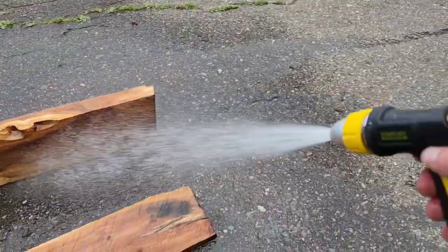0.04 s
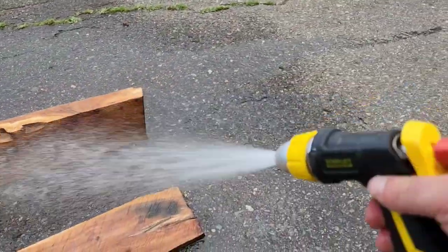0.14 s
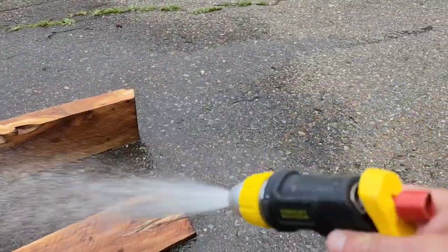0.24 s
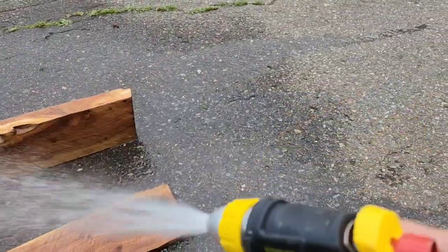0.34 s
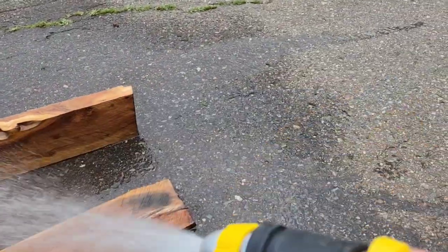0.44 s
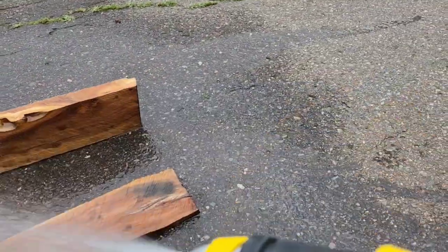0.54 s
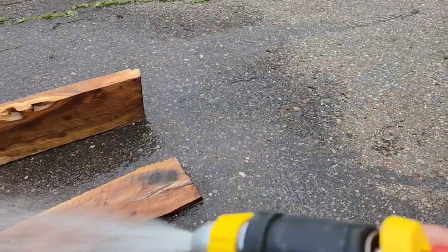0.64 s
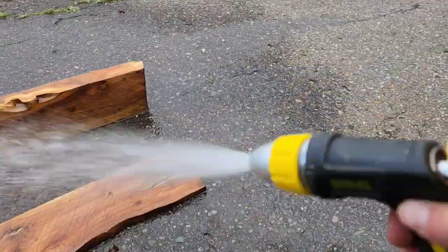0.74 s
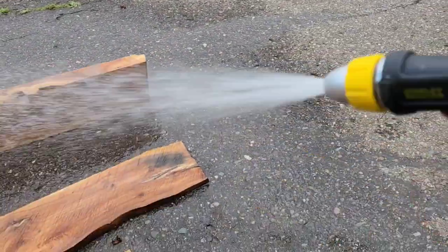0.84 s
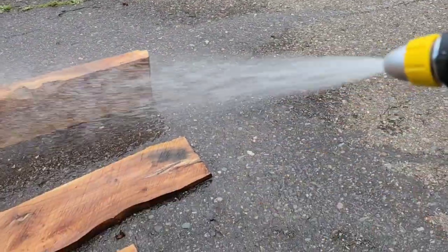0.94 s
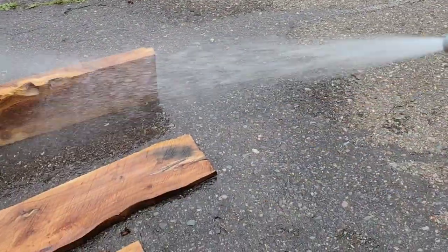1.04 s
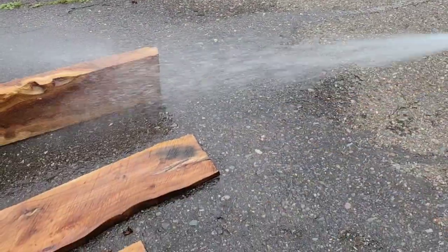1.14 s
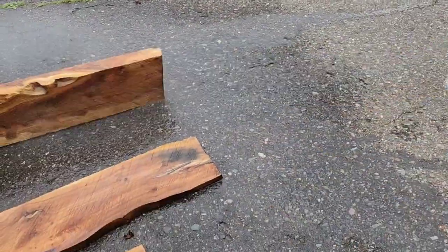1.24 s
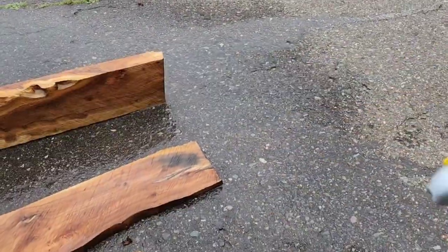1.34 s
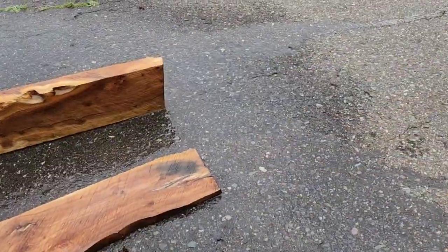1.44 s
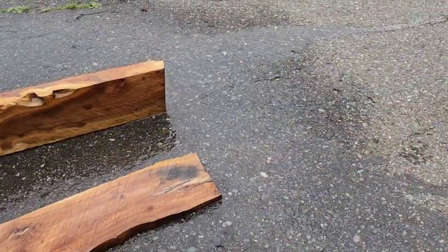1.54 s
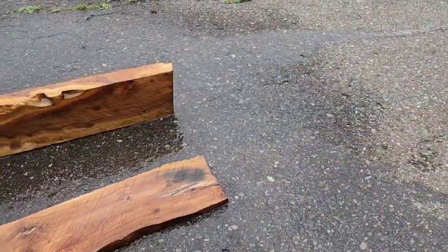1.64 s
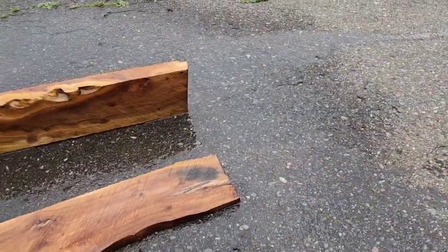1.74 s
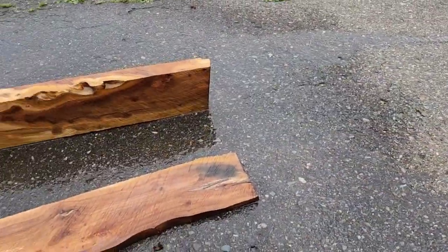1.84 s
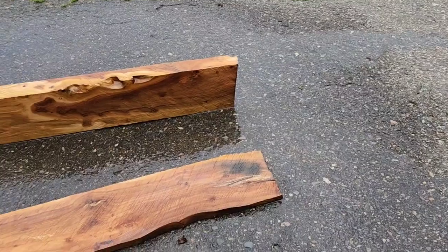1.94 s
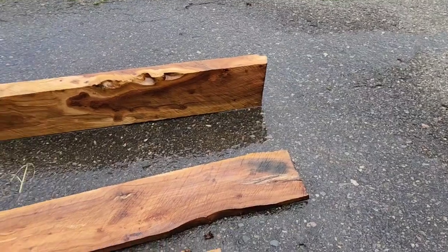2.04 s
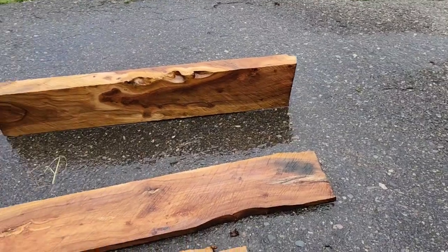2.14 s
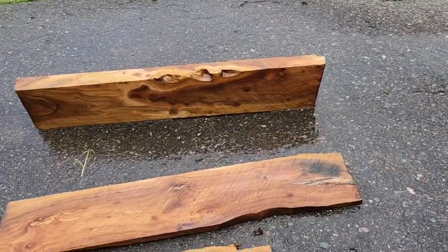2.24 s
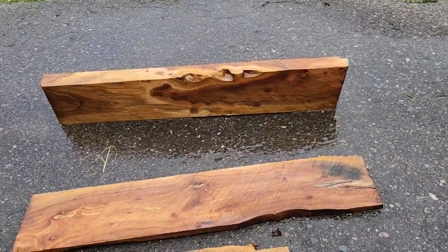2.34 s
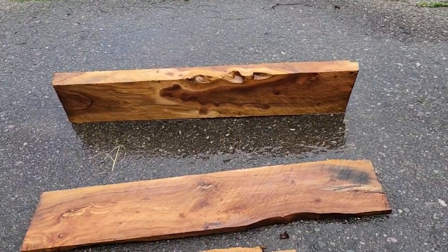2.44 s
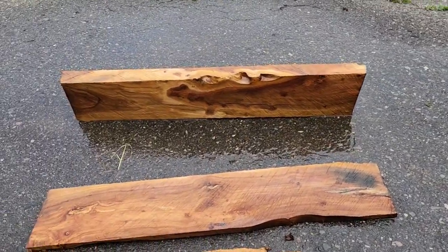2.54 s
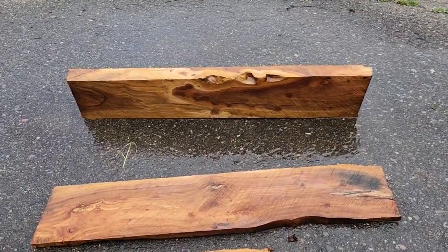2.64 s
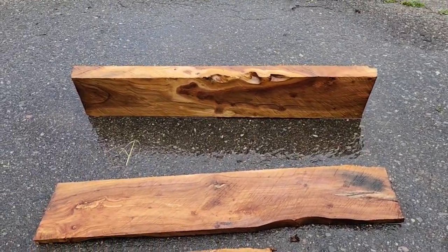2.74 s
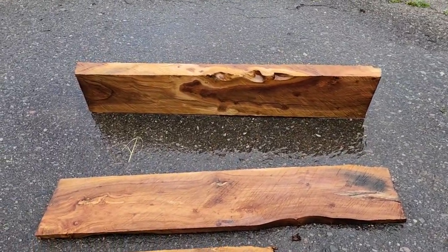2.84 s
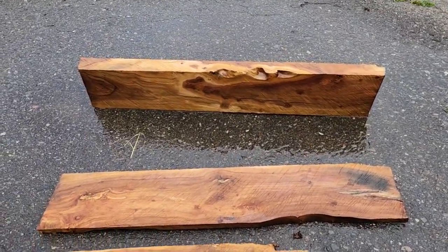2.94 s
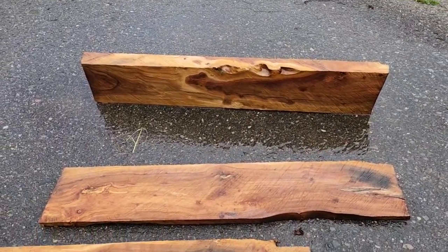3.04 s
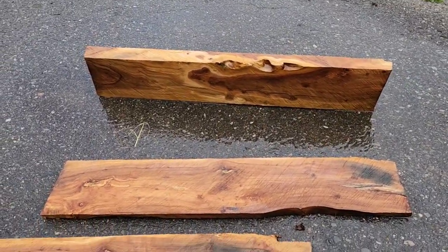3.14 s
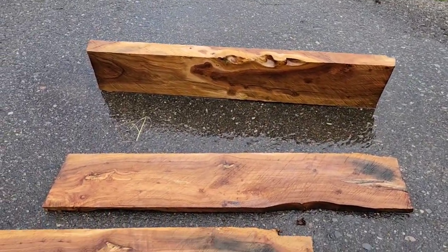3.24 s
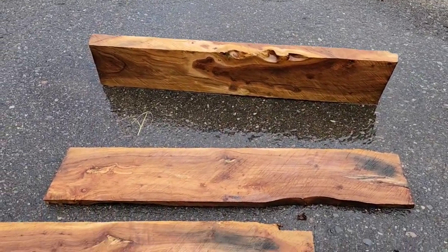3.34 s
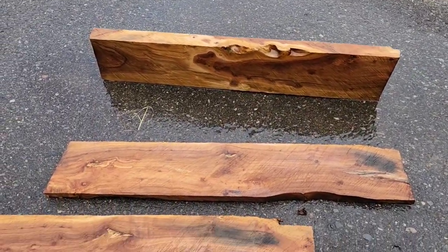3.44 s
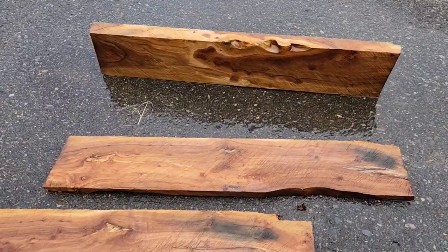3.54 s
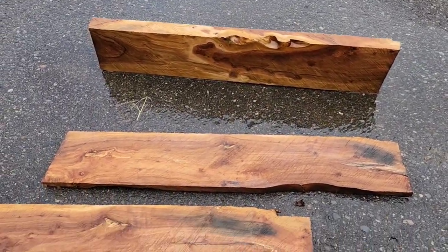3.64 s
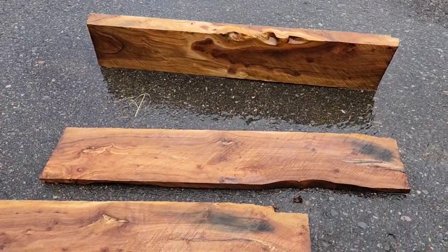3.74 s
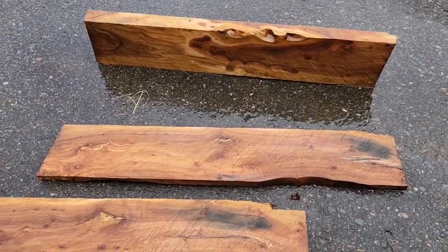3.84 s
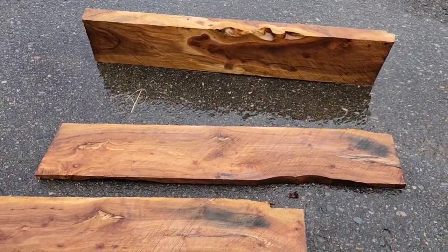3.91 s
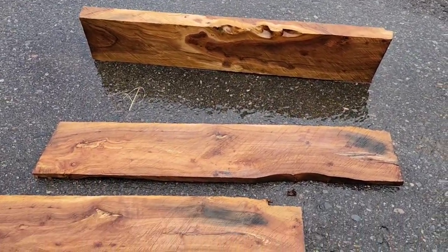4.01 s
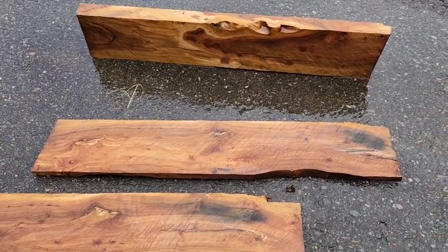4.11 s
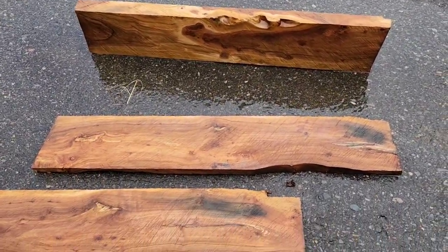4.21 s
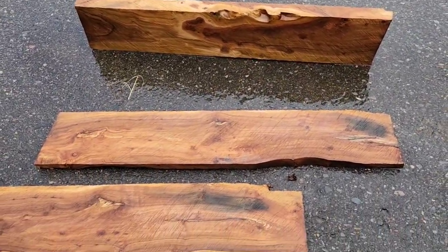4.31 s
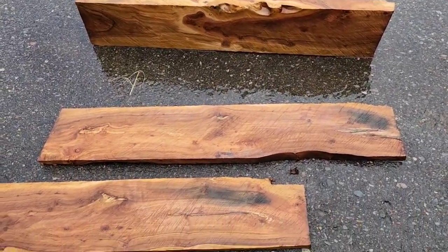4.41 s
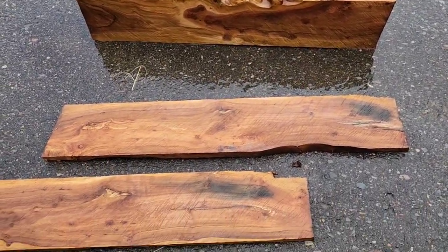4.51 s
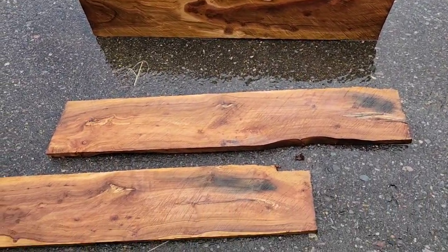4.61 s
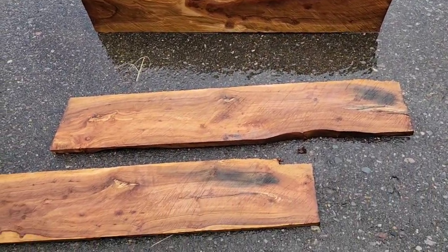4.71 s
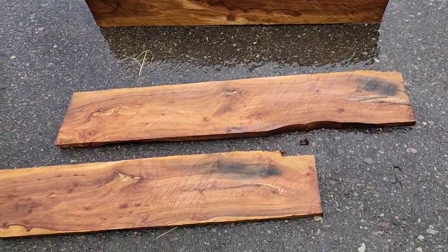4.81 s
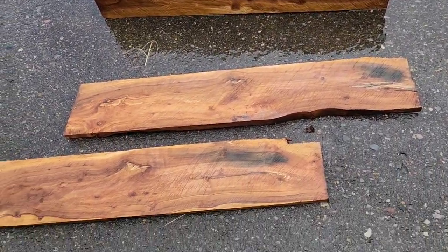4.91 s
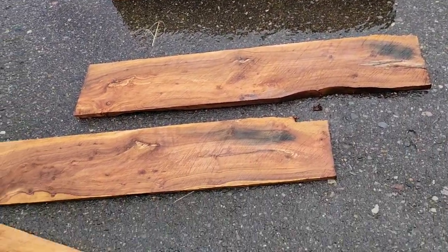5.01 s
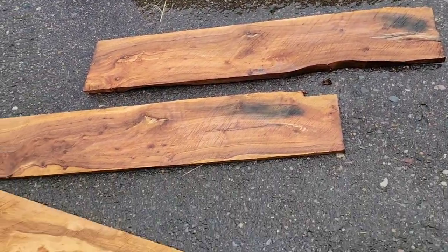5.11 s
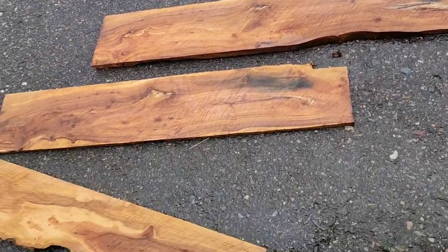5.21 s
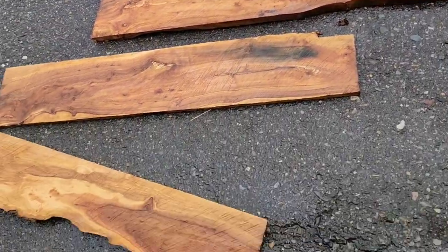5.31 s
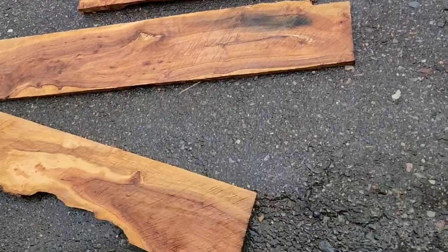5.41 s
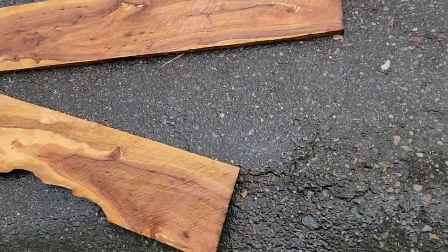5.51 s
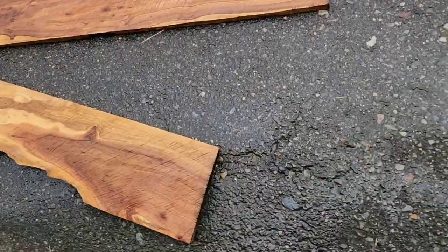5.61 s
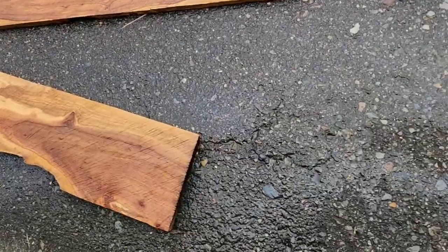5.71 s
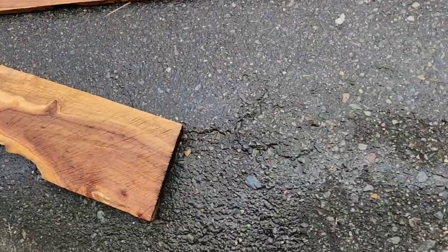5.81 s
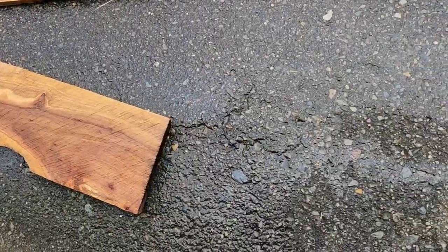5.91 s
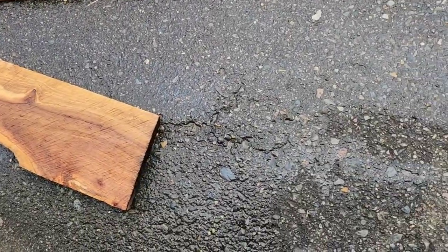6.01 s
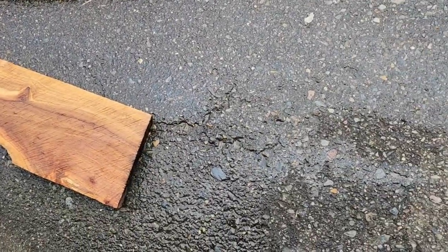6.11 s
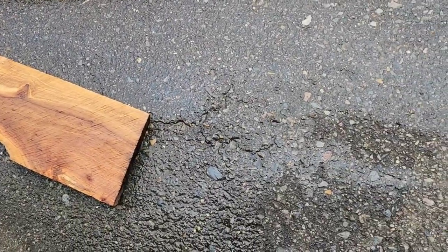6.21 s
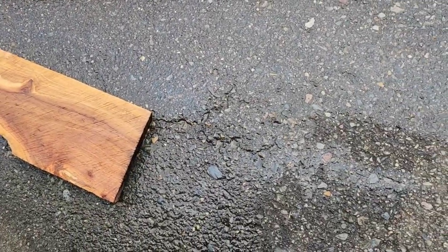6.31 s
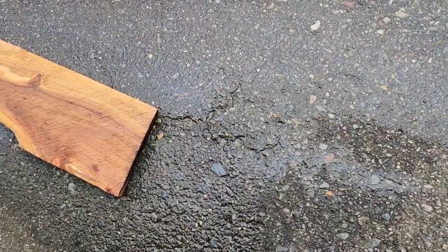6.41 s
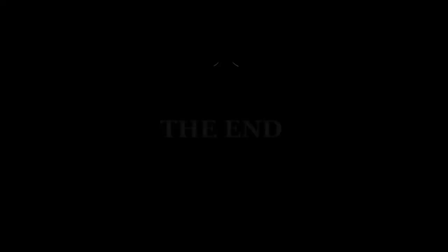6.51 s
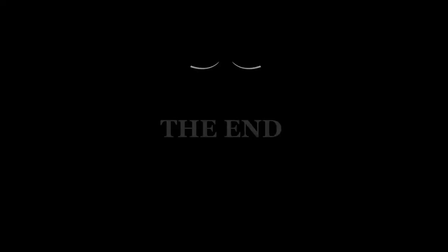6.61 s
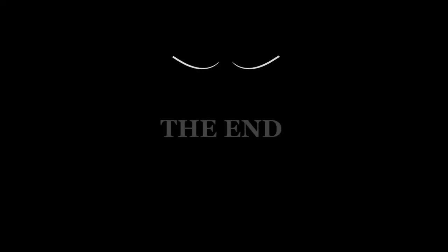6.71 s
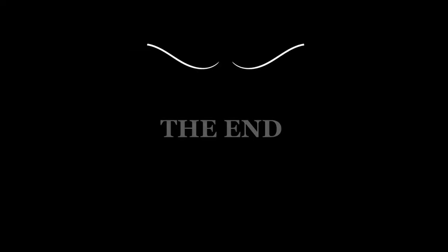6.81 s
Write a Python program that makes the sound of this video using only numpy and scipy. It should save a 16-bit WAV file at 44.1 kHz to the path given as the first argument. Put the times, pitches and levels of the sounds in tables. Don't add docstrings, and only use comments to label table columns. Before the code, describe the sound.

Loud hissing hose spray sweeps over boards and pavement, snaps off with a click, leaving far traffic, a trilling bird and faint wind puffs.

```python
import sys
import numpy as np
from scipy import signal
from scipy.fft import rfft, irfft
from scipy.io import wavfile
from scipy.ndimage import uniform_filter1d, minimum_filter1d

SR = 44100
rng = np.random.default_rng(int(sys.argv[2]) if len(sys.argv) > 2 else 0)


def file_out(sig):
    cols = np.atleast_2d(sig).T
    lim = np.clip(cols, -1, 1)
    pcm = np.round(lim * 32767).astype(np.int16)
    wavfile.write(sys.argv[1], SR, pcm)


def volts_from_db(level):
    exponent = np.asarray(level, float) / 20
    return 10 ** exponent


N = 302570
CLOCK = np.arange(0, N / SR, .01)
EDGE_HZ = 15700

# level/dB, lift on wood/dB, runs on after the trigger/s, then falls/(dB/s)
SPRAY_LAYERS = [
    (-28, -4, 0.068, 411),
    (-35, 1.5, 0.028, 303.5),
    (-39.5, 1.5, .005, 195.5),
    (-54, 9.5, .01, 85.5),
]
# low f/Hz, high f/Hz
SPRAY_BANDS = [(9500, 16000), (3000, 8500), (600, 2500), (100, 500)]
# f/Hz, density/(dB per Hz)
SPRAY_TONE = [(65, -26.5), (110, 7), (209, -7), (470, -9), (603, -8.5), (993, -7.5), (1470, -4.5),
              (2750, -7), (4250, -2.5), (5010, -8.5), (7440, -4), (9340, -9.5), (11500, 2), (14800, 0.5),
              (15700, -1.5)]
# f/Hz, likeness 0-1
SPRAY_SAME = [(60, 1), (200, 0.96), (700, 0.6), (1500, 0.65), (3500, .35), (7000, 0.078), (12000, .05)]
# f/Hz, left-right/dB
PORTS = [(60, 2), (99, 3.5), (160, -1.5), (270, -0.5), (450, 3.5), (740, 1.5), (1220, 5.5), (2010, 0.5),
         (3330, -3.5), (5500, 5.5), (9080, 5.5), (15000, -4.5)]
# t/s, left lead/ms, flow/dB, share landing on wood 0-1
AIM = [
    (0, 0.063, 0, 0.27),
    (.08, 0.012, 1, 0.15),
    (.2, 0.14, 0.5, 0.2),
    (.5, 0.19, 1, 0.37),
    (.74, .1, 1, 0.28),
    (.82, .0, 1, 1),
    (.9, -0.096, 0.5, 0.5),
    (1.04, -0.16, -1, 0.33),
    (1.15, -0.17, -3, 0.45),
]
SPRAY_PAN_DB, PAN_DB_PER_MS = -1.2, 11
MIST_BRIGHT_DB, BRIGHT_DB_PER_MS, MIST_DULLED_DB = 1, 2.5, -4.5
DRY_S = 1.33

# t/s, roar level/dB, nearness of a passing car 0-1
STREET = [(1.5, -59.5, 0.05), (1.9, -59, 0.18), (2.4, -58.5, .2), (2.8, -59.5, 0.52), (3.6, -58.5, .1),
          (4.3, -56.5, 0.43), (4.6, -59, 0.47), (5.0, -59.5, 0.52), (5.4, -59.5, 0.66), (5.95, -60, 1),
          (6.4, -57.5, 0.66)]
# low f/Hz, high f/Hz
STREET_BANDS = [(30, 150), (400, 1000), (1050, 2300), (2900, 5200), (900, 1400)]
# f/Hz, density/(dB per Hz)
STREET_TONE = [(15, -35), (25, -3), (48, 5), (68, -1.5), (128, -10), (183, -17), (354, -19.5), (623, -14.5),
               (799, -15.5), (1610, -28.5), (2120, -28), (2780, -49), (4170, -43.5), (5600, -57.5),
               (7280, -93.5), (12300, -120)]
# f/Hz, likeness 0-1
STREET_SAME = [(60, 0.98), (180, 0.91), (550, 0.65), (1650, 0.19), (4970, 0.0683), (15000, 0.04)]
# f/Hz, left-right/dB
STREET_SIDE = [(60, 0.0), (130, -1), (290, 2.5), (640, 0), (1410, 2.5), (3100, 5.5), (6820, 9), (15000, 4)]
# t/s, level/dB
CHORUS = [(1.3, -76.5), (1.5, -72), (2.0, -69.5), (2.3, -79), (3.5, -83.5), (4.3, -77), (4.6, -85.5),
          (4.9, -75), (5.2, -83), (5.6, -77.5), (5.95, -85.5), (6.4, -84.5)]
# f/Hz, density/(dB per Hz)
HISS_TONE = [(3290, -31.5), (5600, 0), (7040, -1), (8920, -18.5), (9980, -16.5), (11500, -2), (12700, -7),
             (15100, -6), (15700, -8.5)]
# t/s, lift/dB, lasts/s
RUSTLES = [
    (1.35, 13.5, 0.49),
    (4.25, 3, .2),
    (4.85, 8, .12),
    (5.2, 1.5, .25),
    (5.696, 8, 0.26),
    (6.199, -1.5, .3),
]
RUMBLE_DB, RUMBLE_FOLLOWS, UPPER_DB, NEAR_LIFT_DB = -49, .3, -5, 5
WHINE_DB, WHINE_LIFT_DB = -6, 9.5
BREEZE_DB, BREEZE_S, BREEZE_DIES_S = 5.5, 1.4, .35
DIP_S, DIP_DB, DIP_LASTS_S = 1.1, -21.5, 0.028
HAZE_DB = 5.5
HISS_DB, LEAVES_DB, LEAVES_FOLLOW = -93, -91.5, .25

# t/s, peak level/dB, left-right/dB, pitch f/Hz
PUFFS = [
    (0.794, -36.5, -17, 117),
    (0.827, -28, -8, 32.3),
    (1.047, -33.5, 11, 69),
    (1.335, -36, -7, 59.6),
    (1.425, -37, -15, 81),
    (2.163, -38.5, 0.0, 67),
    (5.463, -29, -10, 46.2),
    (6.183, -48.5, 3, 83.2),
]

# t/s, peak level/dB, left-right/dB
TRIGGER = (1.1472, -10, -5)
# f/Hz, level/dB, t60/s
TRIGGER_MODES = [(2300, 0, .007), (3100, -6, .004), (4200, -2, .005), (5300, -3, .004)]
SQUEAL_HZ, SQUEAL_DB, SQUEAL_PEAK_S = 2890, -60, 1.295
SQUEAL_RISE_DB_PER_S, SQUEAL_FALL_DB_PER_S = 6, 150

# t/s, peak level/dB, left-right/dB, treble lift/dB
TICKS = [
    (4.788, -47, 7.5, -17.5),
    (4.816, -54, -8, -30.5),
    (4.8905, -57.5, -9, -16.5),
    (5.1097, -35, -10.5, -17.5),
    (5.5133, -52, -4.5, -20),
    (5.1179, -45.5, -13.5, -17.5),
]
# t/s, peak level/dB, left-right/dB, treble lift/dB
SPITS = [
    (1.2304, -28, -1.5, 10),
    (1.6965, -70, 1.0, 16),
    (5.837, -65.5, 16, 16),
    (6.4003, -67, 7, 16),
]
# f/Hz, density/(dB per Hz)
TICK_TONE = [(1060, -66), (1800, -0.5), (2290, -7), (4420, -3), (5580, -24.5), (6900, -9), (9640, -30.5),
             (12300, 0), (15600, -24.5), (16500, -36)]
# t/s, peak level/dB, lasts/s
SCUFF = [
    (5.075, -64, 0.033),
    (5.125, -65.5, 0.018),
    (5.18, -75, 0.028),
]
# f/Hz, density/(dB per Hz)
SCUFF_TONE = [(1650, -38.5), (2800, -8), (3170, -0.5), (3450, -4), (4250, -3.5), (7000, -19), (7580, -3.5),
              (8630, -20.5), (12000, -6), (15700, -10)]

# t/s, level/dB
TRILL = [(1.345, -49), (1.431, -51), (1.513, -50), (1.593, -48.5), (1.679, -48.5), (1.761, -49),
         (1.847, -51.5), (1.93, -53)]
# t/s, length/s, level/dB
FALLS = [
    (2.156, 0.106, -50),
    (2.412, 0.09, -51),
]
# t/s, length/s, from f/Hz, to f/Hz, level/dB
RISES = [(2.96, 0.041, 3080, 3240, -74), (3.231, 0.058, 3450, 3710, -69), (3.364, 0.038, 3100, 3195, -67.5),
         (3.703, .045, 3130, 3190, -66), (4.341, .07, 2970, 3060, -70), (5.873, .054, 2610, 2700, -70.5)]
# t/s, length/s, from f/Hz, to f/Hz, level/dB
LEVEL = [
    (1.27, .085, 7350, 7750, -72),
    (4.85, .2, 3780, 3770, -74.5),
]
# t/s, length/s, level/dB
CHIPS = [
    (2.092, 0.051, -64),
    (2.351, 0.037, -61),
    (2.66, .03, -62),
    (5.666, 0.022, -61),
]
# t/s, from f/Hz, to f/Hz, level/dB, left-right/dB
FAR = [(2.236, 4000, 3190, -59.5, -8), (2.493, 3800, 3140, -58, -7), (2.62, 5030, 4470, -71, 11),
       (2.74, 4700, 3750, -65, -3), (2.877, 4750, 3520, -66.5, 1), (3.019, 4620, 3400, -69.5, -4.5),
       (3.596, 4800, 3270, -69.5, -3), (3.797, 5010, 5170, -81, 5.5), (3.915, 4380, 3320, -68.5, -8),
       (3.97, 3900, 4500, -75, -2), (4.0, 5080, 5080, -80, 4), (4.027, 3600, 3170, -71.5, -6),
       (4.138, 3580, 3400, -72, -6), (4.237, 3706, 3170, -67, -10), (4.3, 3950, 3500, -70.5, -14),
       (4.419, 4180, 4700, -70.5, 0), (4.473, 3600, 3250, -71, -3), (4.512, 4080, 4480, -69.5, 2),
       (4.585, 3150, 3520, -72, -7), (5.445, 4200, 3730, -74.5, -8), (5.52, 3500, 4360, -74, -13),
       (5.57, 4580, 3700, -72.5, -11), (5.615, 3700, 4760, -81, -4), (5.785, 3450, 3050, -74, -3.5)]
# f/Hz, t60/s
ECHO_T60 = [(1000, 1.2), (3000, 0.59), (4500, 0.81), (7000, 0.52), (12000, 0.15)]
FALL_HZ, SAG_HZ, CHIP_FROM_HZ, CHIP_TO_HZ = 4200, 55, 5500, 7440
FALL_PAN_DB, RISE_PAN_DB, LEVEL_PAN_DB, CHIP_PAN_DB = -5, -6, -3, 3
FAR_S, FAR_S_PER_KHZ, FAR_DIRECT_DB = .017, .013, -5
CUT_S = 6.4416


def evened(x):
    return x / np.sqrt(np.mean(x ** 2) + 1e-20)


def smoothed(x, size):
    return uniform_filter1d(uniform_filter1d(x, size), size)


def read(points, hz):
    f, value = np.transpose(points)
    return np.interp(np.log(hz + 1), np.log(f + 1), value)


def curve(rows):
    s, *columns = np.transpose(rows)
    return [np.interp(CLOCK, s, c) for c in columns]


def bump(s, lasts):
    return np.exp(-((CLOCK - s) / lasts) ** 2)


def add(mix, s, sound, pan_db):
    part = mix[:, round(s * SR):][:, :len(sound)]
    part += sound[:part.shape[1]] * volts_from_db(np.array([[pan_db / 2], [-pan_db / 2]]))


def drops(per_s, spread_db, share):
    size = volts_from_db(spread_db * np.minimum(rng.exponential(1, (2, N)), 4))
    size = size * rng.choice([-1., 1.], (2, N))
    hits = size * (rng.random((2, N)) < per_s / SR)
    return np.sqrt(share) * evened(hits) + np.sqrt(1 - share) * rng.standard_normal((2, N))


def patches(shape, wide, long):
    hills = uniform_filter1d(rng.standard_normal(shape), wide, 0)
    return evened(uniform_filter1d(hills, long, 1))


def paint(streams, size, tone, bands, rows, same, side, patchy_db, pan_db=0, aim=((0, 0, 0),)):
    hz, t, z = signal.stft(streams, SR, nperseg=size, noverlap=size * 3 // 4)
    s, *columns = np.transpose(rows)
    tone_db = read(tone, hz) - 80 * (hz > EDGE_HZ)
    centres = [np.sqrt(lo * hi) for lo, hi in bands]
    field_db = tone_db[:, None] + patchy_db * patches(z.shape[1:], wide=size // 64, long=10)
    for k, (lo, hi) in enumerate(bands):
        inside = (hz >= lo) & (hz < hi)
        own_db = 10 * np.log10(np.sum(volts_from_db(2 * tone_db[inside])) / len(hz))
        weight = read(sorted((c, float(j == k)) for j, c in enumerate(centres)), hz)
        field_db = field_db + weight[:, None] * (np.interp(t, s, columns[k]) - own_db)
    aim_s, lead_ms, bright_db = np.transpose(aim)
    bright_shape = [(2000, 0), (3100, -1), (4250, 1), (5200, -.7), (7500, .6), (11000, 0)]
    field_db = field_db + read(bright_shape, hz)[:, None] * np.interp(t, aim_s, bright_db)
    c = np.clip(read(same, hz), 0, 1)[:, None]
    late = np.exp(-2j * np.pi * hz[:, None] * np.interp(t, aim_s, lead_ms) / 1000)
    tilt_db = (read(side, hz)[:, None] + np.interp(t, s, pan_db * np.ones(len(s)))) / 2
    left = z[0] * volts_from_db(tilt_db)
    right = (c * late * z[0] + np.sqrt(1 - c ** 2) * z[1]) / volts_from_db(tilt_db)
    return signal.istft([left, right] * volts_from_db(field_db), SR, nperseg=size, noverlap=size * 3 // 4)[1][:, :N]


def spray():
    lead_ms, flow_db, wood = curve(AIM)
    shut = CLOCK - TRIGGER[0]
    layers = [db + flow_db + wood_db * wood - fall * np.maximum(shut - on, 0)
              for db, wood_db, on, fall in SPRAY_LAYERS]
    bright_db = np.where(shut > 0, MIST_DULLED_DB, MIST_BRIGHT_DB + BRIGHT_DB_PER_MS * lead_ms)
    water = paint(drops(per_s=4000, spread_db=3.5, share=.25), 512, SPRAY_TONE, SPRAY_BANDS,
                  np.transpose([CLOCK] + layers), SPRAY_SAME, PORTS, 1.3,
                  pan_db=SPRAY_PAN_DB + PAN_DB_PER_MS * lead_ms, aim=np.transpose([CLOCK, lead_ms, bright_db]))
    return volts_from_db(1.5) * water * volts_from_db(-300 * np.maximum(np.arange(N) / SR - DRY_S, 0))


def street():
    (roar_db, near), (chorus_db,) = curve(STREET), curve(CHORUS)
    dip_db = DIP_DB * bump(DIP_S, DIP_LASTS_S) + HAZE_DB * np.clip((DIP_S - CLOCK) / 0.11, 0, 1)
    rumble_db = RUMBLE_DB + RUMBLE_FOLLOWS * (roar_db - roar_db.mean())
    rumble_db = rumble_db + BREEZE_DB * bump(BREEZE_S, BREEZE_DIES_S)
    upper_db = roar_db + UPPER_DB + NEAR_LIFT_DB * near + dip_db
    whine_db = roar_db + WHINE_DB + WHINE_LIFT_DB * near + dip_db
    rows = np.transpose([CLOCK, rumble_db, roar_db + dip_db, upper_db, chorus_db, whine_db])
    traffic = paint(rng.standard_normal((2, N)), 1024, STREET_TONE, STREET_BANDS, rows,
                    STREET_SAME, STREET_SIDE, 1.1)
    stir_db = sum(db * bump(s, lasts) for s, db, lasts in RUSTLES)
    leaves_db = LEAVES_DB + LEAVES_FOLLOW * (chorus_db - chorus_db.mean()) + .3 * stir_db
    hiss = paint(rng.standard_normal((2, N)), 512, HISS_TONE, [(10500, 15500), (5800, 9100)],
                 np.transpose([CLOCK, HISS_DB + stir_db, leaves_db]), STREET_SAME, STREET_SIDE, 1.6)
    return volts_from_db(2.0) * traffic + hiss


def wind():
    out, t = np.zeros((2, N)), np.arange(round(.09 * SR)) / SR
    for s, db, pan_db, hz in PUFFS:
        swing = np.sin(2 * np.pi * hz * t) * np.exp(-((t - .03) / 0.0092) ** 2)
        add(out, s, volts_from_db(db) * swing, pan_db)
    return out


def trigger_snap():
    out, t = np.zeros((2, N)), np.arange(1024) / SR
    s, peak_db, pan_db = TRIGGER
    snap = sum(volts_from_db(db - 60 * t / t60) * np.sin(2 * np.pi * hz * t) for hz, db, t60 in TRIGGER_MODES)
    add(out, s, volts_from_db(peak_db) * snap * np.minimum(t / .0007, 1), pan_db)
    return out


def squeal():
    t, out = np.arange(TRIGGER[0], 1.5, 1 / SR), np.zeros((2, N))
    late = t - SQUEAL_PEAK_S
    db = SQUEAL_DB + np.minimum(SQUEAL_RISE_DB_PER_S * late, -SQUEAL_FALL_DB_PER_S * late)
    waver_db = 3 * evened(smoothed(rng.standard_normal(len(t)), 400))
    tone = np.sqrt(2) * np.sin(2 * np.pi * SQUEAL_HZ * t) * signal.windows.tukey(len(t), .1)
    add(out, t[0], volts_from_db(db + waver_db) * tone, LEVEL_PAN_DB)
    return out


def ticks():
    out, t = np.zeros((2, N)), np.arange(1024) / SR
    hz = np.fft.rfftfreq(len(t), 1 / SR)
    treble = np.clip((hz - 5000) / 5000, 0, 1) * (hz < EDGE_HZ)
    for s, db, pan_db, lift_db in TICKS + SPITS:
        colour = volts_from_db(read(TICK_TONE, hz) + (lift_db + 13.0) * treble)
        crack = irfft(rfft(rng.standard_normal(len(t))) * colour) * volts_from_db(-60 * t / 0.012)
        add(out, s, volts_from_db(db + 2.0) * crack / abs(crack).max(), pan_db)
    return out


def note(length, from_hz, to_hz, slide_at, slide_for):
    u = np.linspace(0, 1, round(length * SR))
    slide = np.sin(np.pi / 2 * np.clip((u - slide_at) / slide_for, 0, 1)) ** 2
    hz = from_hz + (to_hz - from_hz) * slide
    flutter = volts_from_db(1.5 * evened(smoothed(rng.standard_normal(9000), 150)))[:len(u)]
    held = 1 / (1 + abs(np.gradient(hz)) / 2.6)
    whistle = np.sqrt(2) * np.sin(2 * np.pi * np.cumsum(hz) / SR)
    return whistle * signal.windows.tukey(len(u), .4) * flutter * held


def scattered(x, t60):
    t = np.arange(3000) / SR
    burst = rng.standard_normal((2, len(t))) * volts_from_db(-60 * t / t60)
    return signal.fftconvolve(x, burst / np.linalg.norm(burst[0]), axes=1)[:, :N]


def echo(x):
    taps = rng.standard_normal((2, SR)) * (rng.random((2, SR)) < 1200 / SR)
    taps[:, :250] = 0
    hz, t, z = signal.stft(taps, SR, nperseg=256)
    tail = signal.istft(z * volts_from_db(-60 * t / read(ECHO_T60, hz)[:, None]), SR, nperseg=256)[1]
    return signal.fftconvolve(x, tail / np.linalg.norm(tail[0]), axes=1)[:, :N]


def birds():
    song, trill, hidden, open_air = np.zeros((4, 2, N))
    for s, db in TRILL:
        syllable = note(.042, 4370, 3300, .27, .64)
        add(trill, s, volts_from_db(db - np.linspace(-1.5, 5, len(syllable))) * syllable, -2.5)
        flick = note(0.0203, 5900, 5200, 0.013, 1.0)
        add(hidden, s + .044, volts_from_db(db - 21) * flick, 6)
    for s, length, db in FALLS:
        add(song, s, volts_from_db(db) * note(length, FALL_HZ, FALL_HZ - SAG_HZ, 0.42, 0.46), FALL_PAN_DB)
    for s, from_hz, to_hz, db, pan_db in FAR:
        call = note(FAR_S + FAR_S_PER_KHZ * abs(to_hz - from_hz) / 1000, from_hz, to_hz, -.35, 1.6)
        add(hidden, s, volts_from_db(db - 2.0) * call, pan_db)
        add(open_air, s, volts_from_db(db + FAR_DIRECT_DB) * call, pan_db)
    for s, length, from_hz, to_hz, db in RISES:
        add(open_air, s, volts_from_db(db - 2.0) * note(length, from_hz, to_hz, 0.011, .6), RISE_PAN_DB)
    for s, length, from_hz, to_hz, db in LEVEL:
        add(open_air, s, volts_from_db(db) * note(length, from_hz, to_hz, .3, .7), LEVEL_PAN_DB)
    for s, length, db in CHIPS:
        add(hidden, s, volts_from_db(db) * note(length, CHIP_FROM_HZ, CHIP_TO_HZ, -0.5, 1.34), CHIP_PAN_DB)
    direct = volts_from_db(-1.5) * song + volts_from_db(-3.5) * trill + open_air
    foliage = volts_from_db(-1.5) * scattered(trill, 0.05) + volts_from_db(-1.5) * scattered(hidden, .1)
    to_walls = volts_from_db(-7.0) * open_air + volts_from_db(-6.5) * song + volts_from_db(-5.0) * trill + volts_from_db(-5.5) * hidden
    return direct + foliage + echo(to_walls)


def scuff():
    level = sum(volts_from_db(db) * bump(s, lasts) for s, db, lasts in SCUFF)
    rows = np.transpose([CLOCK, 20 * np.log10(level + 3e-6)])
    drag = paint(drops(per_s=4500, spread_db=-5.5, share=0.34), 256, SCUFF_TONE, [(5500, 27000)], rows,
                 SPRAY_SAME, PORTS, 2.5, pan_db=-14.0)
    return volts_from_db(-2.0) * drag


def scene():
    return spray() + street() + wind() + trigger_snap() + squeal() + ticks() + birds() + scuff()


def masked(x, depth_db, chance_db, cut_db):
    hz, t, z = signal.stft(x, SR, nperseg=1024, noverlap=768)
    power = uniform_filter1d(uniform_filter1d((abs(z) ** 2).sum(0), 8, 0), 8, 1)
    level_db = 10 * np.log10(power + 1e-20)
    loudest_near_db = -minimum_filter1d(-level_db, 70, 0)
    under_db = np.minimum(loudest_near_db - level_db, 9)
    hole = under_db + chance_db * patches(z.shape[1:], wide=5, long=11) > depth_db
    hole = hole & (hz[:, None] > 2600)
    return signal.istft(z * np.where(hole, volts_from_db(cut_db), 1), SR, nperseg=1024, noverlap=768)[1][:, :N]


def top_cut(x):
    return signal.sosfilt(signal.butter(12, 16950, fs=SR, output="sos"), x)


def record(dry):
    thinned = signal.sosfilt(signal.butter(2, 35, "high", fs=SR, output="sos"), dry)
    kept = masked(thinned, depth_db=12.9, chance_db=3.6, cut_db=-32)
    finished = kept * (np.arange(N) < CUT_S * SR)
    return top_cut(finished)


dry = scene()
out = record(dry)
file_out(out)
```